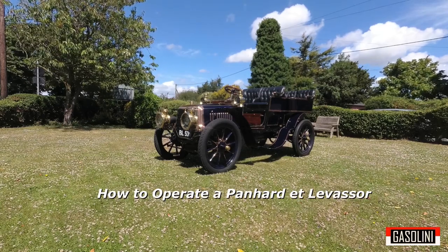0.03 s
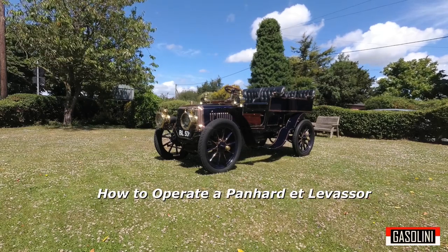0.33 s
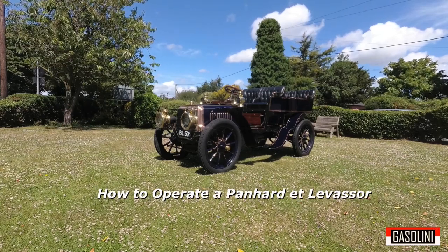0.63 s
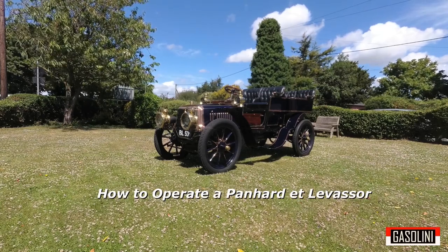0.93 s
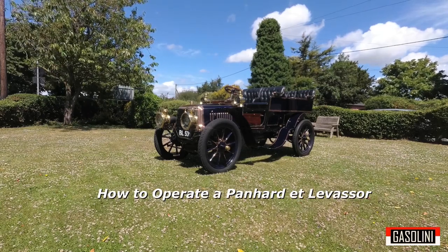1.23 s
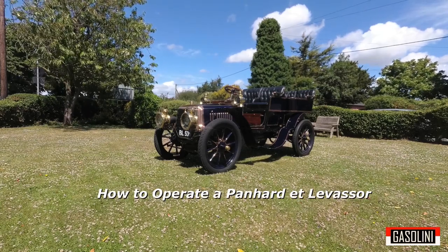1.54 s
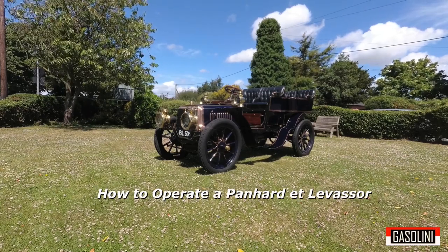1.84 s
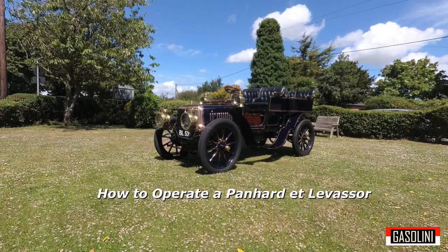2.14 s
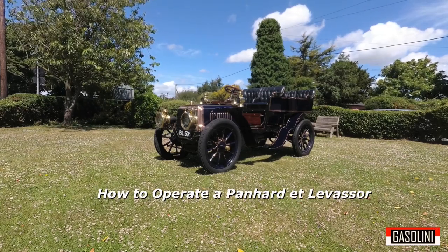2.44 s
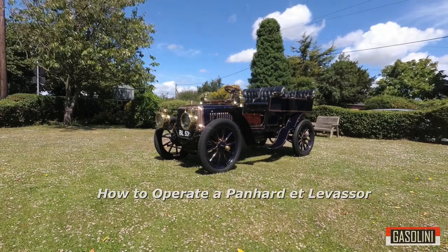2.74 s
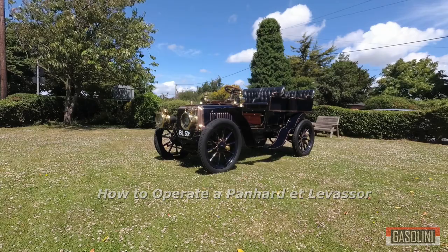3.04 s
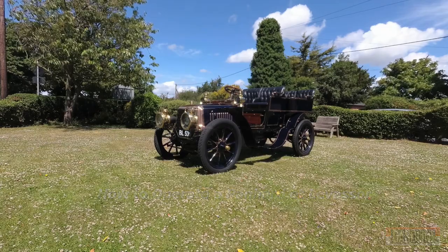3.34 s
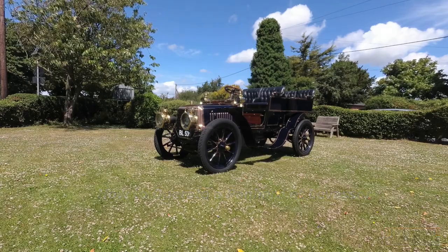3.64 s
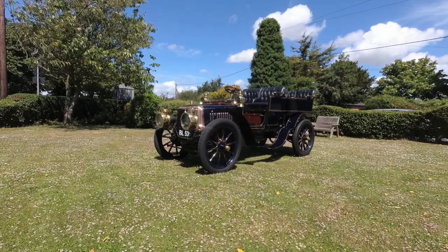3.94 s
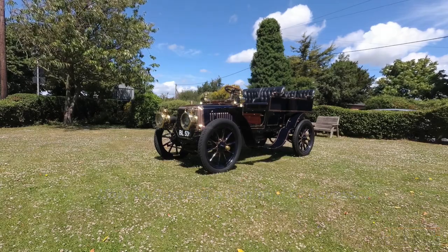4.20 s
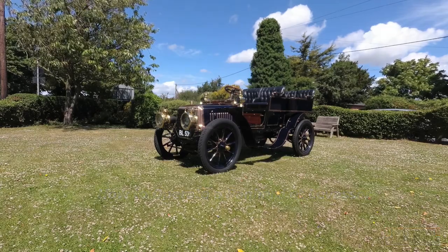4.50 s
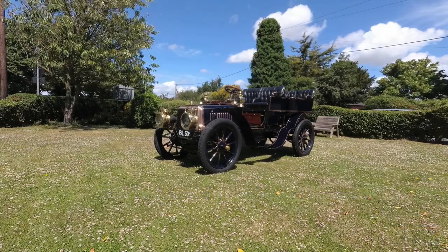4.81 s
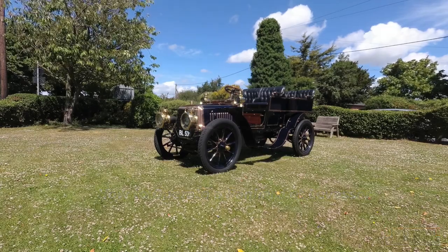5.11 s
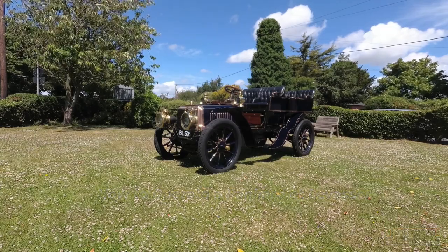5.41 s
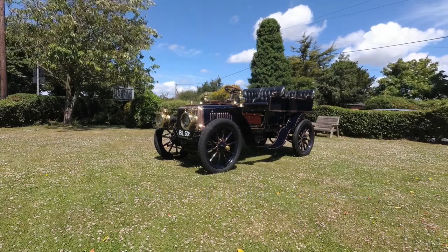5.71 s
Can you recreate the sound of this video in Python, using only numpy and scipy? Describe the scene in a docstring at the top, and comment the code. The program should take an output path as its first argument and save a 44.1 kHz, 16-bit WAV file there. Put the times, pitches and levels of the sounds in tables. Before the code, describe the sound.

An old four-cylinder car engine is already idling at the start, outdoors, a few metres from a stereo microphone. It fires about eighteen times a second, wavering slightly in speed. Each beat brings a bright, lightly ringing valve clack, a midrange clatter and a muffled exhaust chuff, over churning gears and a faint low rumble. On every fourth beat, four to five times a second, a loose part knocks on a metal casing with uneven force, and a push rod gives a tiny dry click and squeak. Two faint, dull bass thumps pass at about 1.6 and 4.7 seconds. The knocking is strongest and most regular from about 3.8 to 4.9 seconds. From around 4.6 seconds the whole sound fades smoothly with the engine still running, and it is almost gone by 6 seconds.

```python
"""On a lawn, a veteran four-cylinder car idles a few metres from a stereo microphone.
At every firing the valve gear clacks, the block clatters and the exhaust chuffs; once in four firings
a loose part knocks on the casing and a dry push rod squeaks. The idle hunts a little, gears churn
underneath, two soft thumps pass in the bass, and the sound is faded out at the end."""
import sys
import numpy as np
from scipy import signal
from scipy.fft import rfft, irfft
from scipy.io import wavfile

SR = 44100
rng = np.random.default_rng(int(sys.argv[2]) if len(sys.argv) > 2 else 0)


def log_audio(samples):
    """Write samples as a 16-bit WAV file to the path given in sys.argv[1]."""
    # one column per channel
    frames = np.atleast_2d(samples).T
    # limit to full scale, then quantise
    limited = np.clip(frames, -1, 1)
    pcm = np.round(limited * 32767).astype(np.int16)
    wavfile.write(sys.argv[1], SR, pcm)


N = 254016
TIME = np.arange(N) / SR
FREQ = np.maximum(np.arange(N // 2 + 1) * SR / N, 1)

# The hunting idle. Each row: time in seconds, firings per second.
IDLE_SPEED = [(.6, 18.416), (.8, 18.955), (1.6, 18.187), (2, 19.011), (2.2, 17.488), (2.4, 18.732),
              (2.6, 17.392), (2.8, 19.474), (3, 18.453), (3.6, 18.344), (4, 18.922), (4.4, 18.247),
              (4.6, 19.15), (4.8, 17.506), (5.4, 19.607), (5.6, 18.585)]
# The four-beat groove, knocking cylinder first.
# Each row: lateness in seconds, valve accent in dB, block accent in dB.
CYLINDER_ACCENTS = [(.0003, -35.5, -25.5), (-0.000076, -34, -29), (.0008, -33, -28), (-0.0022, -33, -28.5)]
# The ring of the springs, one list a valve. Each row: pitch in Hz, t60 in seconds, level in dB.
VALVE_SPRING_MODES = [
    [(3037, 0.045, 6.5), (3650, 0.036, -3), (5170, .025, -8), (6560, 0.084, -4), (9260, 0.041, -3)],
    [(2796, 0.064, 9), (3440, 0.036, -21), (4000, 0.015, 11.5), (5860, 0.16, -2.5), (8700, 0.036, -17)],
    [(3010, 0.054, -9), (4020, 0.018, 2.5), (5060, 0.049, -3.5), (8080, 0.05, -1), (9540, .03, -9.5)],
    [(2420, 0.019, 2), (3790, 0.013, 4), (4750, 0.051, -39), (6146, 0.014, 6), (8820, 0.018, -3)],
]
# Tone curves: bright clack, midrange clatter, muffled chuff, gear churn and low rumble.
# Each row: frequency in Hz, relative level in dB.
CLACK_TONE = [(1500, -35.5), (2800, -2.5), (4300, -3.5), (5500, 0.5), (6400, 3.5), (7300, 0), (8800, 2.5),
              (10500, -1), (12000, -6.5), (14000, -9), (16000, -3)]
BLOCK_TONE = [(200, -31.5), (400, -9.5), (600, -9), (800, -6.5), (1150, 1), (1550, -1), (1880, -0.5),
              (2080, -10), (2900, -9), (3600, -13), (5000, -20.5), (9000, -35)]
EXHAUST_TONE = [(60, -40.5), (160, -26.5), (235, -4.5), (300, -9.5), (410, 1.5), (510, -3), (600, -14),
                (900, -15.5), (2000, -35.5)]
GEAR_TONE = [(160, -23), (225, -2.5), (400, 0), (600, -2.5), (770, 3.5), (1000, 2.5), (1170, 0),
             (1850, -0.5), (2100, -10), (3000, -14), (4300, -20), (8000, -18.5), (12000, -26.5),
             (16000, -22.5)]
RUMBLE_TONE = [(15, -22), (33, -16), (70, -5), (120, -1), (170, 0.5), (260, -6), (600, -40)]
# The loose part's hard hits. Each row: start in seconds, level in dB.
HARD_KNOCKS = [(0.0457, -23), (0.2658, -23.5), (0.743, -23.5), (0.898, -27.5), (1.1235, -23), (1.395, -23),
               (1.8293, -20.5), (2.2679, -22), (2.4829, -26.5), (2.7049, -20.5), (2.9205, -26),
               (3.1303, -26), (3.35, -24), (3.52, -26), (3.567, -24), (3.7862, -19), (3.9975, -19.5),
               (4.2117, -19.5), (4.429, -18.5), (4.6422, -20), (4.864, -21), (5.0858, -30)]
# The ring of the knocked casing and of the crankcase. Each row: pitch in Hz, t60 in seconds, level in dB.
CASING_MODES = [(419, 0.082, -10), (486, 0.048, -6), (1184, 0.058, -7), (1470, 0.023, 6.5),
                (1720, 0.034, 3.5), (1870, 0.023, 9.5)]
CRANKCASE_MODES = [(360, .05, -10.5), (413, 0.073, -5), (510.6, 0.14, -6), (785, 0.052, -1),
                   (1172, 0.04, 5), (1394, 0.062, 2), (1546, 0.089, -10), (1853, 0.045, -4.5),
                   (2917, 0.039, -3)]
# Bumps in the bass. Each row: start in seconds, level in dB.
LOW_THUMPS = [(1.556, -47), (4.68, -47)]
# The stereo image. Each row: frequency in Hz, left minus right in dB, likeness of the sides from 0 to 1.
PORT_IMAGE = [(30, 0, .78), (160, 0, .87), (260, 0, .994), (420, 0, .999), (600, 0, .99), (1800, .2, .98),
              (2300, -4.5, .62), (3000, -3, .55), (3600, 1, .3), (4700, 7, .25), (5800, 1, .6),
              (7000, -1.3, .84), (9500, .5, .85), (12000, -1.7, .8)]
# Phase between the microphone ports. Each row: frequency in Hz, lead of the left in turns.
PORT_PHASE = [(420, 0), (1900, .025), (2300, .05), (3000, .2), (3600, .35), (4700, .62), (5800, .86),
              (7000, 1)]

FIRST_FIRING_S, ACCENT_SHIFT_S = .0338, 1.68
CLACK_SCATTER_DB, CLATTER_SCATTER_DB = .8, 1.66  # from firing to firing
TICK_DB, CLACK_DB, REBOUND_DB = -6, 4.5, -3.5  # on top of the valve accent
SOFT_KNOCK_DB, SOFT_KNOCK_SCATTER_DB = -32, 5
KNOCK_LAG_S, ROD_LAG_S = .0135, .0385  # after the first and the second cylinder fire
BONNET_DECAY_S, BONNET_DB = .0015, -10
FADE_START_S, FADE_DB_PER_S = 4.625, 33.5


def firings():
    """The engine's pulse: the speed sets the beat, the cylinder the accent."""
    elapsed_beats = np.cumsum(np.interp(TIME, *np.transpose(IDLE_SPEED))) / SR
    beat = np.arange(int(elapsed_beats[-1]))
    times = np.interp(beat, elapsed_beats - np.interp(FIRST_FIRING_S, TIME, elapsed_beats), TIME)
    cylinder = (beat - (times > ACCENT_SHIFT_S)) % len(CYLINDER_ACCENTS)  # from here on the accent falls one beat later
    late_s, clack_db, clatter_db = np.array(CYLINDER_ACCENTS)[cylinder].T
    clack_scatter, clatter_scatter = rng.standard_normal((len(beat), 2)).T
    clack_db = clack_db + CLACK_SCATTER_DB * clack_scatter
    clatter_db = clatter_db + CLATTER_SCATTER_DB * clatter_scatter
    return times + late_s, cylinder, clack_db, clatter_db


def valve_gear(times, db):
    """Four valves take turns clacking under the bonnet, each with its own spring ring."""
    count = len(VALVE_SPRING_MODES)
    valves = [valve(times[k::count], db[k::count], modes) for k, modes in enumerate(VALVE_SPRING_MODES)]
    contacts, springs = np.sum(valves, axis=0)
    return bonnet(colour(contacts, CLACK_TONE)) + undb(-5.5) * springs


def valve(times, db, modes):
    """The tappet ticks as it takes up its play, the valve clacks and rebounds; its spring rings along."""
    tick_force, rebound_force, tick_jitter, rebound_jitter = rng.standard_normal((len(times), 4)).T
    tick_db = db + TICK_DB + 2.5 * tick_force
    rebound_db = db + REBOUND_DB + 2.5 * rebound_force
    tick = bursts(times - .019 + .0013 * tick_jitter, tick_db, rise_s=.0021, decay_s=.011)
    clack = bursts(times - .001, db + CLACK_DB, rise_s=.0018, decay_s=.0071)
    rebound = bursts(times + .0083 + .0018 * rebound_jitter, rebound_db, rise_s=.0014, decay_s=.008)
    contacts = np.sqrt(tick ** 2 + clack ** 2 + rebound ** 2) * rattle(spread_db=2.5)
    return contacts, ring(contacts, modes)


def block(times, db):
    """Each firing shakes the crankcase, and the piston slaps a moment later."""
    jitter, force = rng.standard_normal((len(times), 2)).T
    shake = bursts(times - .005, db - 1, rise_s=.0057, decay_s=.017)
    slap = bursts(times + .013 + .0032 * jitter, -34 + 2 * force, rise_s=.0035, decay_s=.015)
    contacts = np.hypot(shake, slap) * rattle(spread_db=2.5)
    return colour(contacts, BLOCK_TONE)


def exhaust(times, knock_times):
    """A muffled, uneven chuff for each firing; the knocking cylinder fires hardest."""
    jitter, force = rng.standard_normal((len(times), 2)).T
    chuff = bursts(times + .00033 + .0048 * jitter, -39 + 1.7 * force, rise_s=.0041, decay_s=.036)
    punch = bursts(knock_times - .003, -35.5, rise_s=.0031, decay_s=.017)
    return colour(np.hypot(chuff, punch) * rattle(spread_db=1.5), EXHAUST_TONE)


def loose_part(cycle_times):
    """A loose part knocks: hard at the cued times, softly on each cycle's beat that has no hard hit."""
    hard_times, hard_db = np.transpose(HARD_KNOCKS)
    soft_db = SOFT_KNOCK_DB + SOFT_KNOCK_SCATTER_DB * rng.standard_normal(len(cycle_times))
    free = np.abs(cycle_times[:, None] - hard_times).min(axis=1) > .02
    return knock(hard_times, hard_db) + knock(cycle_times[free], soft_db[free])


def knock(times, db):
    """The part presses on the casing and bounces once, each time on a slightly different spot."""
    out = np.zeros((2, N))
    for time, level_db in zip(times, db):
        modes = [(hz * (1 + .0052 * rng.standard_normal()), t60, mode_db)
                 for hz, t60, mode_db in CASING_MODES]
        response = ringing(modes)
        response *= 1 - np.exp(-TIME[:len(response)] / .0014)  # the ring builds while the contact lasts
        hit_times = time + np.array([-.0012, .00458 * rng.uniform(.594, 1.19)])
        for start, hit_db in zip((hit_times * SR).astype(int), (0, -13)):
            span = out[0, start:start + len(response)]
            span += undb(level_db + hit_db) * response[:len(span)]
    return band(out, low_hz=320, high_hz=2170)  # the small casing radiates no bass


def push_rod(times):
    """Once a cycle a dry push rod clicks and scrapes through its guide with a rising squeak."""
    level_db = -34.5 + rng.standard_normal(len(times))
    since_click_s = TIME - times[np.maximum(np.searchsorted(times, TIME) - 1, 0)]
    glide = 5 * np.clip(since_click_s, 0, .06)
    grip = band(rng.standard_normal((2, N)), low_hz=9.7, high_hz=200)
    hz = 2220 * (1 + glide + .03 * grip / grip.std())  # uneven grip makes the pitch waver
    tone = np.sin(2 * np.pi * np.cumsum(hz, axis=1) / SR)
    squeak = tone * bursts(times, level_db, rise_s=.0038, decay_s=.0068)
    click = bursts(times, level_db - 3, rise_s=.0012, decay_s=.0032) * rattle(spread_db=4.5)
    return squeak + bonnet(colour(click, CLACK_TONE))


def gears():
    """The bed: timing gears and flywheel churn and keep the crankcase ringing, over a low rumble."""
    churn = undb(-33.5) * colour(rattle(spread_db=2), GEAR_TONE)
    crankcase = undb(-40) * band(ring(rattle(spread_db=5.5), CRANKCASE_MODES), low_hz=277, high_hz=3770)
    rumble = undb(-57.5) * colour(rng.standard_normal((2, N)), RUMBLE_TONE)
    return churn + crankcase + rumble


def thumps():
    """Soft, dull bumps in the bass, dead centre."""
    bass = band(rng.standard_normal(N), low_hz=60, high_hz=190)
    bumps = bursts(*np.transpose(LOW_THUMPS), rise_s=.006, decay_s=.018) * bass / bass.std()
    return bumps * np.array([[1], [0]])  # all mid, no side


def bonnet(x):
    """Dense early reflections inside the engine bay blur every contact."""
    t = TIME[:SR // 25]
    response = rng.standard_normal(len(t)) * np.exp(-t / BONNET_DECAY_S) * (t > .001)
    response *= undb(BONNET_DB) / np.linalg.norm(response)
    response[0] = 1  # the direct sound
    return convolve(x, response / np.linalg.norm(response))


def microphone_ports(mid_side):
    """Mid and side to left and right: bass reaches both ports much alike, the low treble spreads wide."""
    balance_db, likeness = over_freq(PORT_IMAGE)
    lead_turns, = over_freq(PORT_PHASE)
    mid, side = rfft(mid_side) * np.sqrt([(1 + likeness) / 2, (1 - likeness) / 2])
    left = (mid + side) * undb(balance_db / 2)
    right = (mid - side) * undb(-balance_db / 2) * np.exp(-2j * np.pi * lead_turns)
    return irfft(np.array([left, right]), N)


def bursts(times, db, rise_s, decay_s):
    """An envelope that swells and dies after each blow."""
    blows = np.zeros(N)
    np.add.at(blows, np.clip(times * SR, 0, N - 1).astype(int), undb(db))
    t = TIME[:SR // 5]
    shape = (1 - np.exp(-(t / rise_s) ** 2)) * np.exp(-t / decay_s)
    return convolve(blows, shape / shape.max())


def rattle(spread_db):
    """Grit: dense tiny contacts of uneven force, with separate noise for mid and side."""
    force = np.repeat(undb(spread_db * rng.standard_normal(N // 32 + 1)), 32)[:N]
    return rng.standard_normal((2, N)) * force / np.sqrt(np.mean(force ** 2))


def ringing(modes):
    """The ring of damped modes after one blow."""
    t = TIME[:SR // 5]
    return sum(undb(db - 60 * t / t60) * np.sin(2 * np.pi * hz * t) for hz, t60, db in modes)


def ring(x, modes):
    """A resonator: noise rings the modes and keeps its power."""
    response = ringing(modes)
    return convolve(x, response / np.linalg.norm(response))


def colour(x, tone):
    """Minimum-phase EQ along a tone curve; white noise keeps its power."""
    gain = undb(over_freq(tone)[0])
    cepstrum = irfft(np.log(gain / np.sqrt(np.mean(gain ** 2))), N)
    # folding the cepstrum keeps the ring behind each attack
    cepstrum[1:N // 2] *= 2
    cepstrum[N // 2 + 1:] = 0
    return irfft(rfft(x) * np.exp(rfft(cepstrum)), N)


def band(x, low_hz, high_hz):
    """Steep band-pass."""
    return signal.sosfilt(signal.butter(4, [low_hz, high_hz], "band", fs=SR, output="sos"), x)


def convolve(x, response):
    """Each row of x played through a response."""
    return signal.fftconvolve(np.atleast_2d(x), response[None], axes=1)[:, :N]


def over_freq(table):
    """A table's columns as curves over log frequency."""
    hz, *columns = np.transpose(table)
    return [np.interp(np.log(FREQ), np.log(hz), column) for column in columns]


def undb(db):
    """Decibels to gain."""
    return 10 ** (np.asarray(db) / 20)


def scene():
    """The mix: the engine's beat, knocks and squeaks over the gear bed and the thumps."""
    times, cylinder, clack_db, clatter_db = firings()
    knock_times = times[cylinder == 0] + KNOCK_LAG_S
    rod_times = times[cylinder == 1] + ROD_LAG_S
    engine = valve_gear(times, clack_db) + block(times, clatter_db) + exhaust(times, knock_times)
    return microphone_ports(engine + loose_part(knock_times) + push_rod(rod_times) + gears() + thumps())


def record(dry):
    """An even fade-out in decibels and a steep cut of the top."""
    fade = undb(-FADE_DB_PER_S * np.maximum(TIME - FADE_START_S, 0))
    high_cut = signal.ellip(10, .2, 70, 15750, fs=SR, output="sos")
    return signal.sosfilt(high_cut, dry * fade)


dry = scene()
out = record(dry)
log_audio(out)
```